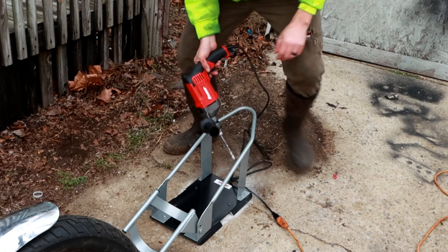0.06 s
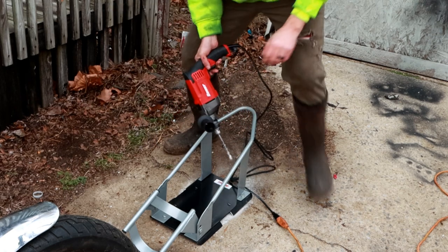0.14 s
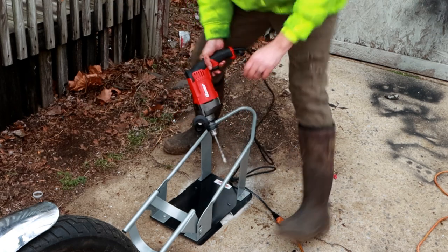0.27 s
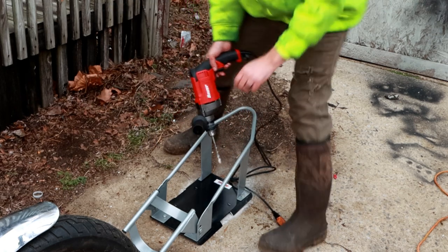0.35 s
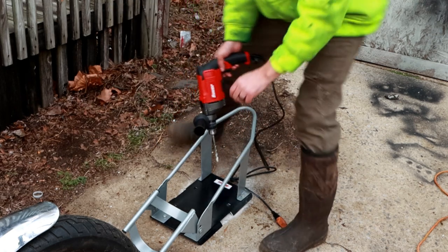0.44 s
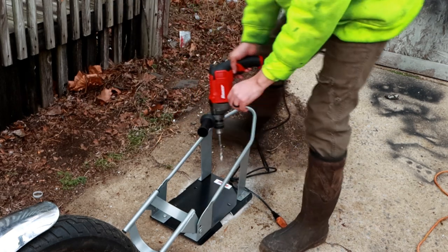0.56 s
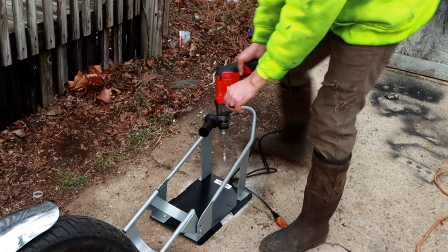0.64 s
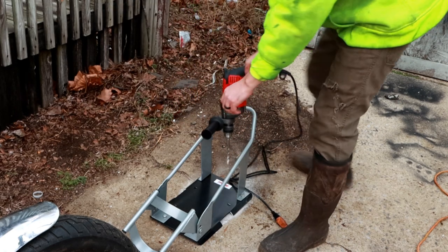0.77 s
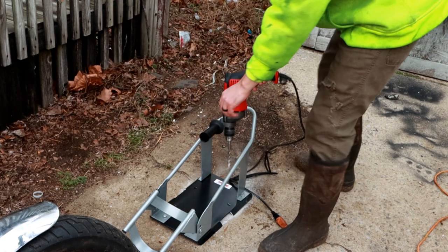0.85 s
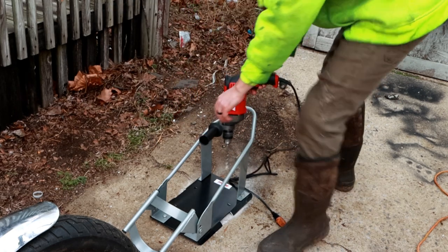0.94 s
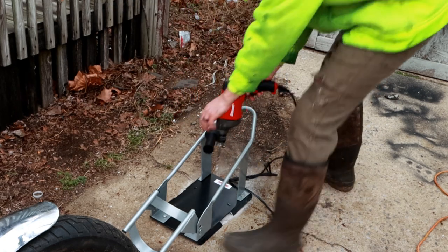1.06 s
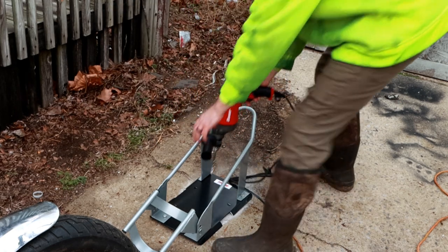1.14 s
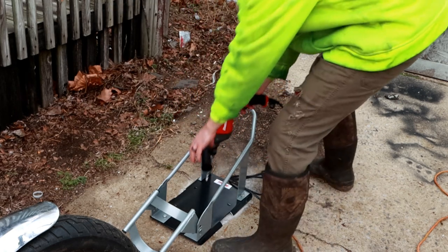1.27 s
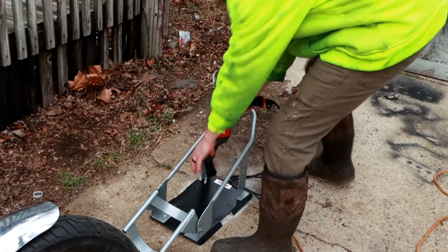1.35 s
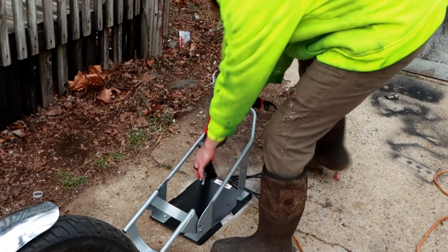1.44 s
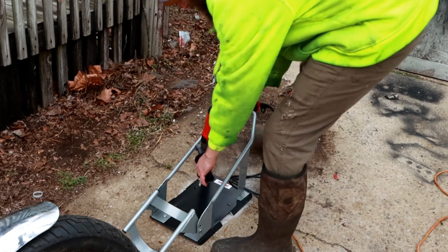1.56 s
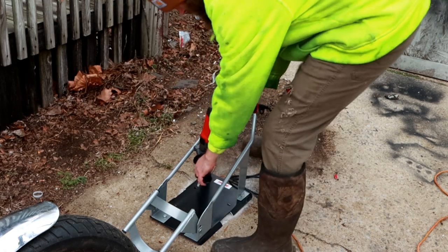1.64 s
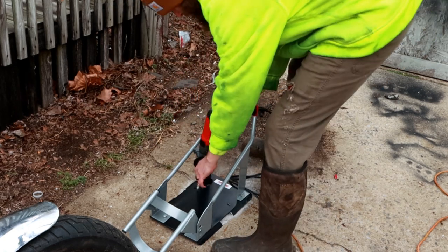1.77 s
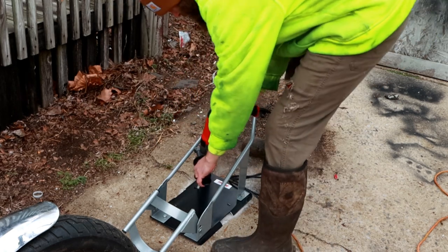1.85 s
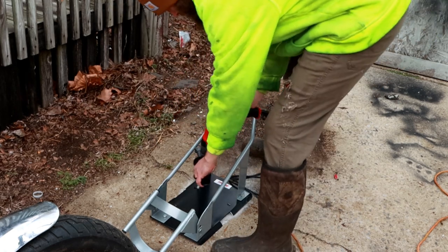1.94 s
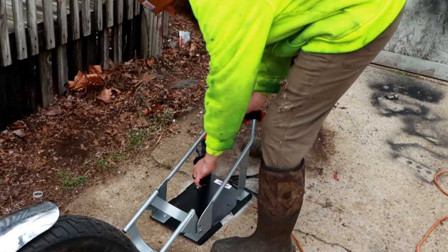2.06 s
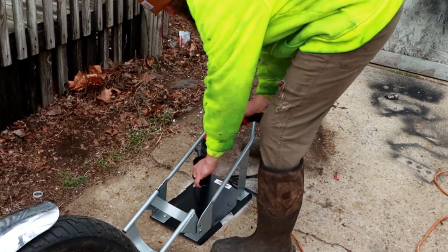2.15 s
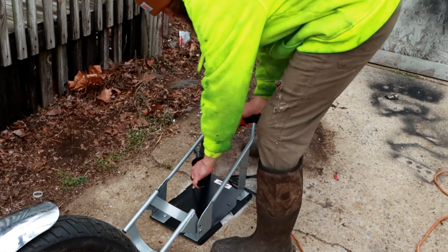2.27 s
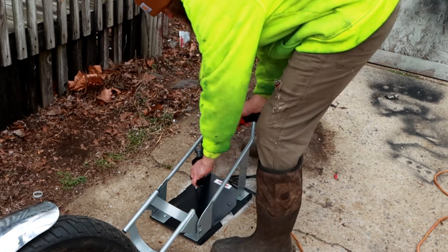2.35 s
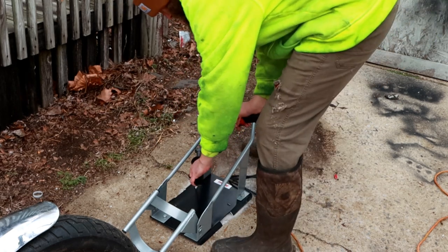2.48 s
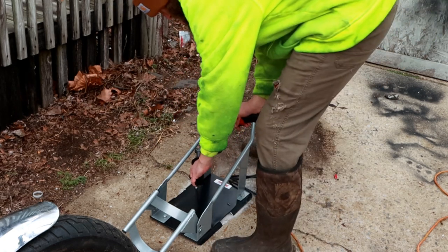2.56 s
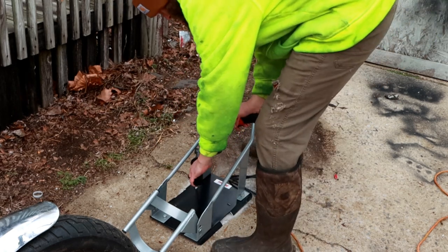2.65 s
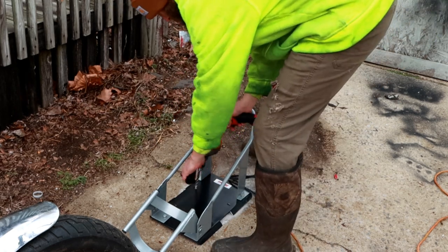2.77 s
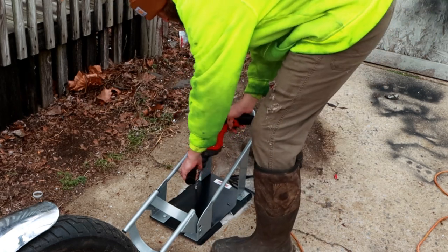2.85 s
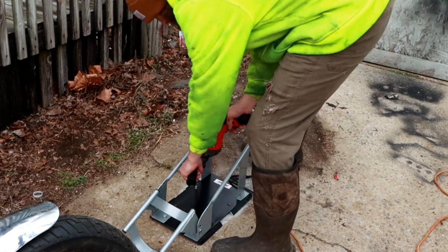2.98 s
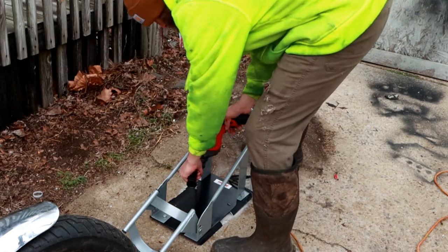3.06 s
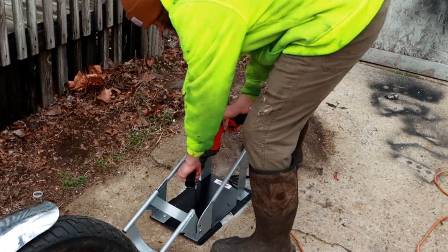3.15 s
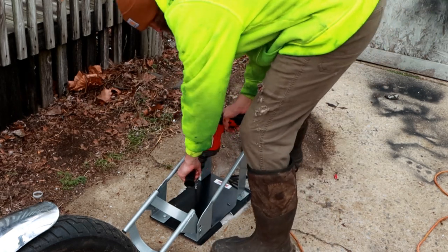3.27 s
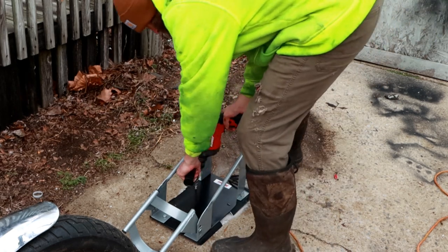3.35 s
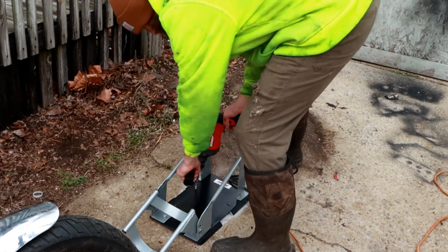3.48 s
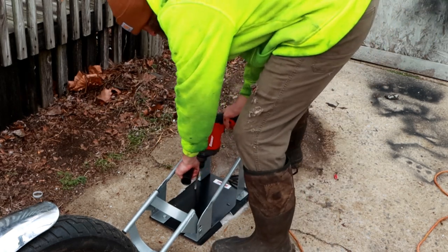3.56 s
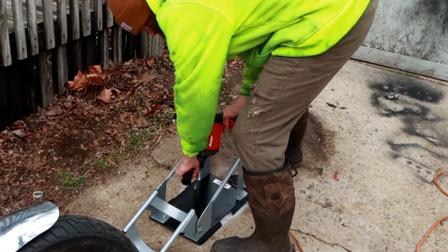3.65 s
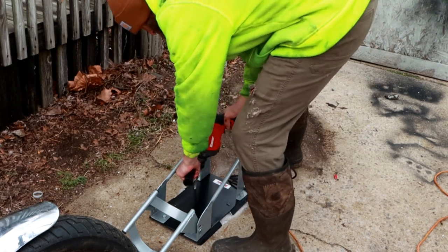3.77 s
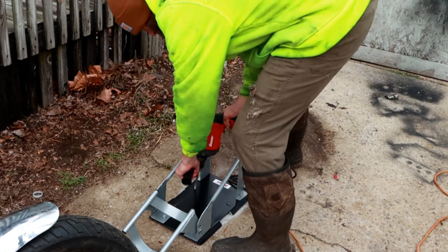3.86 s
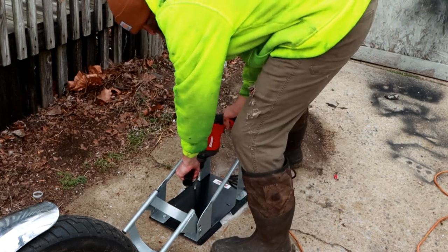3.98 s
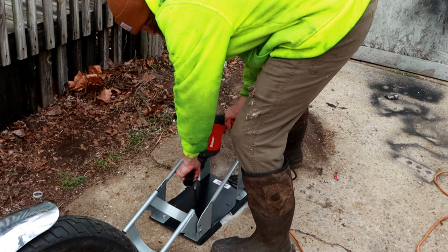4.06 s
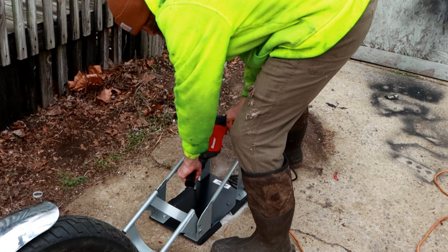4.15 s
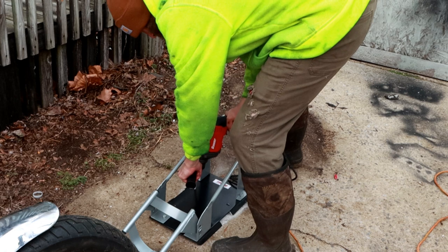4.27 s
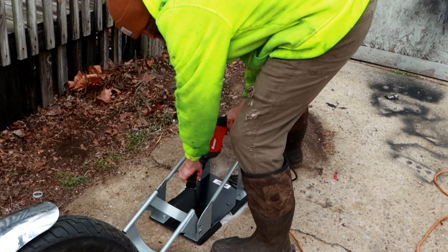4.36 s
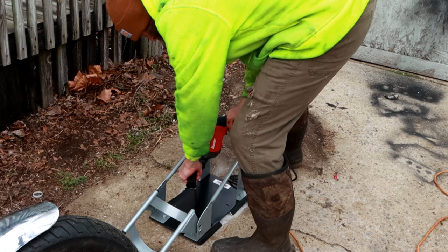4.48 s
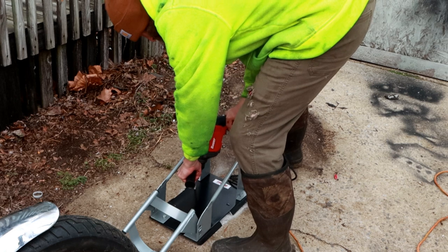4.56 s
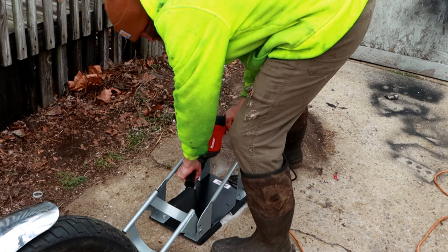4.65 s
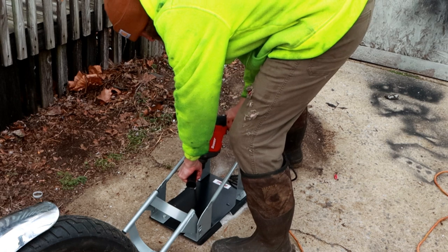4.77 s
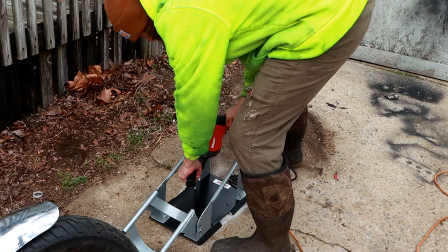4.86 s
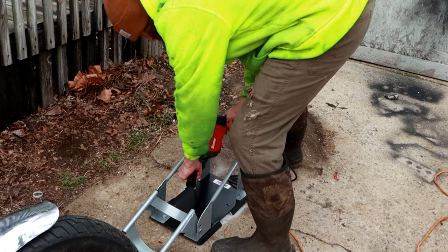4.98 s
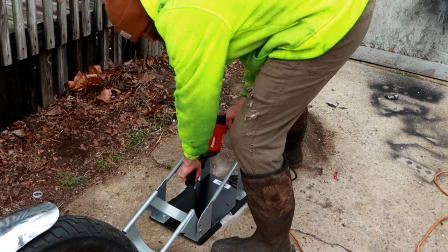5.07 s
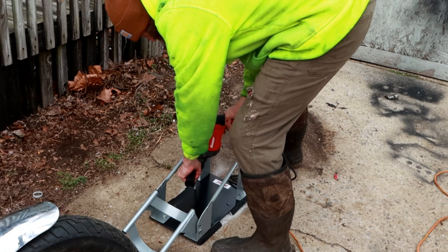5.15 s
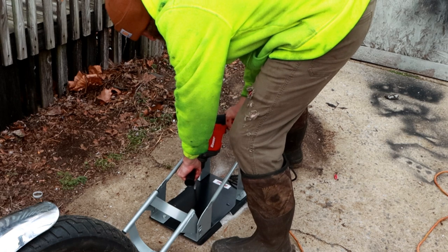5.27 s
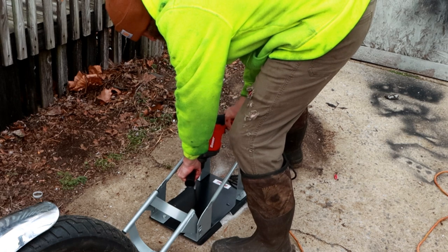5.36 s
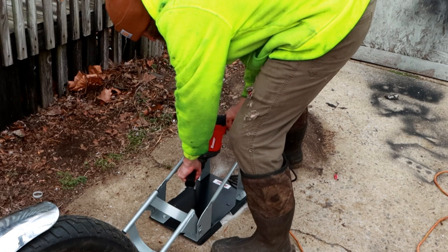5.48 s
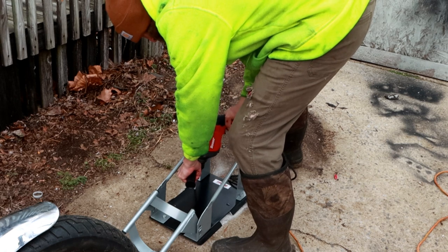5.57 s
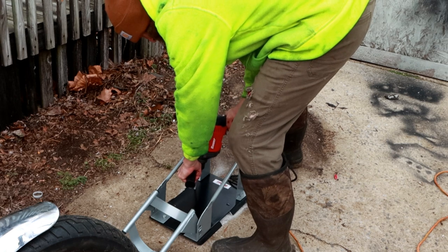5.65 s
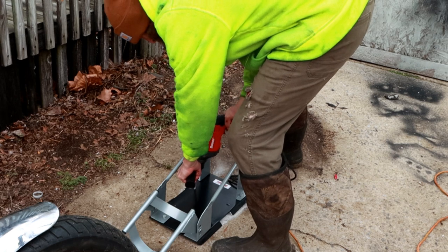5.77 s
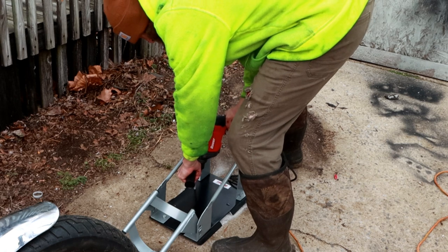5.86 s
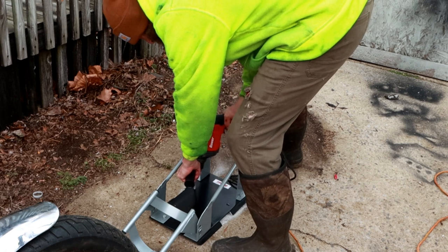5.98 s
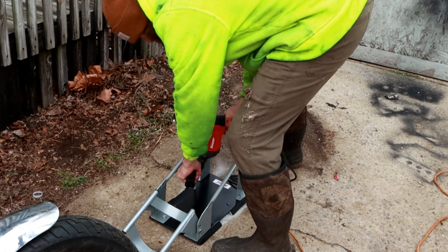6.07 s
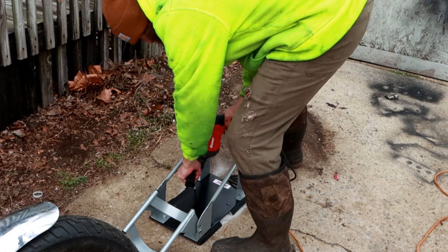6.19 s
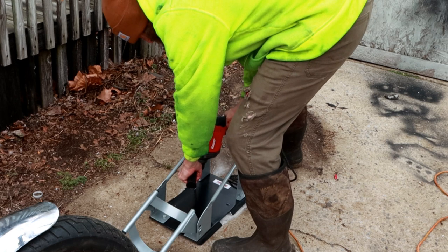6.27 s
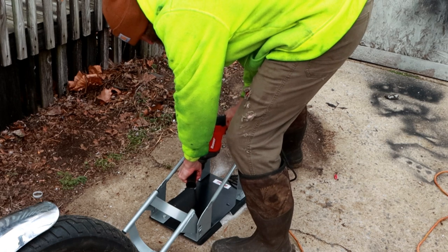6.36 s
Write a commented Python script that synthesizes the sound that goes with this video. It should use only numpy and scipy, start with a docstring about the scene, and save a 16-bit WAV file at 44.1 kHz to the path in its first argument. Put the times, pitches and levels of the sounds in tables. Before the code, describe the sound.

Boots scuff grit and a metal bit knocks a ringing steel stand, then a hammer drill bursts into loud, steady, buzzing hammering on concrete.

```python
"""Outdoors, a worker's boots scuff grit and cloth slides, with small ticks and wind rumble in a murmuring yard.
A hammer drill's bit then knocks against a steel stand, which rings with its own set of decaying tones.
Gears tick as the trigger is squeezed, and the ratchet runs up to some five hundred blows a second.
Each blow adds to a clean tone, rings stand and concrete and throws a puff of grit, heard as hiss.
As the worker leans in, the drill slows. One microphone hears it all, with a short echo of the small hard sounds."""
import sys
import numpy as np
from scipy import signal
from scipy.fft import rfft, irfft
from scipy.io import wavfile
from scipy.ndimage import uniform_filter1d

SR = 44100
rng = np.random.default_rng(int(sys.argv[2]) if len(sys.argv) > 2 else 0)


def transcribe(signal):
    """Save signal, clipped to [-1, 1], as a 16-bit WAV file at the path in sys.argv[1]."""
    frames = np.atleast_2d(signal).T
    limited = np.clip(frames, -1, 1)
    pcm = np.round(limited * 32767).astype(np.int16)
    wavfile.write(sys.argv[1], SR, pcm)


N = 283210  # length of the scene in samples


def undb(db):
    """Turn decibels into a plain gain."""
    return 10 ** (np.asarray(db) / 20)


def unit(x):
    """Scale a sound to an average (rms) level of 1."""
    return x / np.sqrt(np.mean(x ** 2))


def curves(table, outside_db=-120):
    """Columns of a table at every sample; outside_db beyond its span, but a table reaching the end holds."""
    s, *columns = np.transpose(table)
    t = np.arange(N) / SR
    stops_early = s[-1] < N / SR - .02
    return [np.interp(t, s, c, outside_db, outside_db if stops_early else c[-1]) for c in columns]


def colour(x, spectrum, peaks=()):
    """Shape x by (pitch_hz, level_db) points and bell-shaped lifts; rms 1."""
    hz = np.maximum(np.fft.rfftfreq(N, 1 / SR), 1)
    point_hz, point_db = np.transpose(spectrum)
    db = np.interp(np.log(hz), np.log(point_hz), point_db, -90, -90)
    for centre_hz, width_hz, lift_db in peaks:
        db = db + lift_db * np.exp(-2 * ((hz - centre_hz) / width_hz) ** 2)
    return unit(irfft(rfft(x) * undb(db), N))


def ring(x, hz, width_hz):
    """Resonance with gain 1 at its centre."""
    return signal.lfilter(*signal.iirpeak(min(hz, .45 * SR), hz / width_hz, SR), x)


def body(x, peaks):
    """Steep resonances side by side, each filtered twice; rms 1."""
    total = 0
    for k, (hz, width_hz, db) in enumerate(peaks):
        mode = ring(ring(x, hz, width_hz), hz, 2.0 * width_hz)
        total = total + (-1) ** k * undb(db) * mode  # neighbours have opposite signs
    return unit(total)


def band(x, lo_hz, hi_hz):
    """Keep the part of a sound between two pitches."""
    return signal.sosfilt(signal.butter(2, [lo_hz, hi_hz], "band", fs=SR, output="sos"), x)


def walk(rate):
    """Random levels held 1 / rate s and smoothed twice; spread near 1."""
    k = int(SR / rate)
    steps = np.repeat(rng.standard_normal(N // k + 1), k)
    return 1.3 * uniform_filter1d(uniform_filter1d(steps, k), k)[:N]


def add(out, s, sound, db):
    """Place a sound at time s with the given peak level."""
    i = int(s * SR)
    out[i:i + len(sound)] += (sound * undb(db) / np.max(np.abs(sound)))[:N - i]


def fade(t60, length=.5):
    """Dying-away curve that falls by 60 dB in t60 seconds."""
    return np.exp(-np.log(1000) * np.arange(int(length * SR)) / SR / t60)


def grains(per_s, spread_db):
    """Clicks at random moments with a long tail of sizes."""
    return (rng.random(N) < per_s / SR) * rng.standard_normal(N) * undb(spread_db * rng.exponential(size=N))


def swell(s, rise, hold, fall):
    """Gain that rises from -25 dB, holds at 1 and falls to -25 dB, straight in dB; silent outside."""
    corners_s = s + np.cumsum([0, rise, hold, fall])
    return undb(np.interp(np.arange(N) / SR, corners_s, [-25, 0, 0, -25], -120, -120))


def speed():
    """Blows per second: the motor runs up through two lags, trigger and rotor, to what the load allows."""
    # ratchet speed that the load allows, sinking as the worker leans in: time_s, blows_per_s
    allowed = [(3.5, 518), (4.5, 518.5), (4.8, 514.2), (5.1, 503), (5.4, 497.1), (5.58, 483.5),
               (5.7, 467.5), (6.0, 461.5), (6.12, 460.3), (6.25, 467), (6.42, 469.2)]
    trigger_s, run_up_s, squeeze_s = 3.583, .14, .04
    t = np.maximum(np.arange(N) / SR - trigger_s, 0)
    lags = run_up_s * np.exp(-t / run_up_s) - squeeze_s * np.exp(-t / squeeze_s)
    still_missing = lags / (run_up_s - squeeze_s)  # share of the full speed
    return curves(allowed, outside_db=0)[0] * (1 - still_missing)


def drill():
    """Ratchet blows: a clean tone at their rate, uneven blows ringing stand and slab, grit hissing once a blow."""
    # colour of bit and concrete: pitch_hz, level_db (per Hz)
    grind_colour = [(470, -37.5), (800, -16.5), (1320, -19), (1490, -13.5), (1960, -14), (2370, -6.5),
                    (2680, -10), (3200, -5.5), (3760, -6), (4150, -2), (6190, -14), (7370, -10.5),
                    (8250, -17.5), (13900, -17), (15800, -17.5)]
    # bell-shaped lifts on that colour: pitch_hz, width_hz, lift_db
    grind_lifts = [(2305, 230, 1), (3200, 530, 2), (4073, 1120, 2.5), (5490, 83, 6), (7373, 800, 3),
                   (13080, 2050, 4.5)]
    # resonances of the stand under the blows: pitch_hz, width_hz, level_db (relative)
    stand_peaks = [(712, 50, 5), (649.1, 130, -3), (874.2, 30, -11), (930.4, 62, -14.5), (1222, 159, -11),
                   (1693.3, 51, -7)]
    # resonances of concrete and base plate: pitch_hz, width_hz, level_db (relative)
    slab_peaks = [(212.96, 36.14, 1), (334.4, 175.5, 0.5)]
    # clean tones of the blows: time_s, blow_tone_db, octave_db, third_harmonic_db (rms, before wavering)
    tone_levels = [(3.64, -55, -42, -44), (3.7, -27, -31, -35), (3.8, -26, -29, -42),
                   (3.92, -29.5, -39, -44), (4.04, -36, -46, -43), (4.14, -28, -45, -42),
                   (4.6, -26.5, -48, -44), (5.0, -28.5, -50, -37.5), (5.42, -30, -52, -36),
                   (5.6, -33, -46, -45), (5.95, -29.5, -43, -50), (6.42, -32, -40, -46)]
    teeth, full_speed = 16, 500  # ratchet teeth per turn of the chuck; reference speed in blows per s
    hz = speed()
    octaves = np.log2(np.maximum(hz, 80) / full_speed)

    def follow_speed(db, db_per_octave, start_s, attack_s):
        """Level that starts when the bit bites and follows the speed; db is the level at full_speed."""
        return undb(db + db_per_octave * octaves) * swell(start_s, attack_s, 10, 1)

    turns = np.cumsum(hz) / SR  # counted in blows, not in turns of the chuck
    blow, phase = turns.astype(int), turns % 1
    tone = 0
    for k, (db, waver_db) in enumerate(zip(curves(tone_levels), (1.4, 3.0, 2.5)), 1):
        tone = tone + undb(db + waver_db * walk(25)) * np.sin(2 * np.pi * k * turns)

    # the two-edged bit repeats its pattern of blows every half turn; the concrete adds its own scatter
    edges = unit(rng.standard_normal(teeth // 2))[blow % (teeth // 2)]
    scatter = rng.standard_normal(N // 40)[blow]
    uneven = (np.diff(blow, prepend=0) > 0) * (.7 * edges + scatter)
    shake = unit(uneven) + .7 * rng.standard_normal(N)

    wobble = 1 + 0.0706 * np.cos(2 * np.pi * turns / teeth)  # once per turn of the chuck
    pulse = 1 + 0.344 * np.cos(2 * np.pi * turns)  # once per blow
    wash = colour(rng.standard_normal(N) * wobble * pulse, grind_colour, grind_lifts)
    puff_gain = undb(.8 * edges + .8 * scatter) * np.exp(-phase / .35)  # fades until the next blow
    puff = colour(rng.standard_normal(N) * puff_gain, grind_colour, grind_lifts)
    # the treble follows each blow closely, the middle rings on between them
    treble = unit(band(puff, 4180, 16400))
    grind = unit(wash + undb(-11.5) * treble + undb(-10) * puff)
    grind = follow_speed(-13.8, 3, 3.63, .065) * undb(0.588 * walk(9.8)) * grind

    # as the hole deepens the stand rings less and the slab drums more
    boring_s = np.arange(N) / SR - 3.7
    ringing_gain = follow_speed(-30.3, 0, 3.63, .04) * undb(-.7 * boring_s + 1.8 * walk(6))
    drumming_gain = follow_speed(-37.5, -6, 3.61, .01) * undb(.9 * boring_s + 1.2 * walk(5))
    ringing = ringing_gain * body(shake, stand_peaks)
    drumming = drumming_gain * body(shake, slab_peaks)
    sound = np.sqrt(2) * tone + ringing + drumming + grind
    # low cut: nothing deep is heard in the drill
    return signal.sosfilt(signal.butter(6, 155, "high", fs=SR, output="sos"), sound)


def knocks():
    """Each knock is a blow and a short rattle that ring the stand's modes; where it lands sets its colour."""
    # bit against the stand: start_s, level_db, boom_db (near 700 Hz), brightness_db (above 3 kHz),
    # edge_db (above 7 kHz), rattle_t60_s; all levels relative
    hits = [(1.7903, -35, 17, 10, -26, .047), (1.8118, -29, 5, -1, -30, .046),
            (1.8444, -53, 28, 0, -15, .12), (1.9645, -38, 14, 5, -24, .09),
            (2.0471, -36, 22, -2, -33, .045), (2.0874, -62, 41, 3, -12, .08),
            (2.1878, -65, 20, 11, -3, .06), (2.374, -30, 15, 5, -28, .04), (2.3994, -38, 3, -3, -30, .065),
            (2.4568, -45, 17, 2, -17, .05), (2.5696, -46, 14, 9, -24, .06), (2.612, -24, 2, 5, -12, .076),
            (2.6938, -50, 5, 2, -21, .12), (2.8501, -45, 14, 12, 11, .03), (2.866, -30, 2, 9, 9, .038),
            (2.8847, -18.5, 0, -1, -21, .076), (2.9094, -31, 3, -2, -10, .11),
            (3.1775, -56, 0, 13, 21, .09), (3.2949, -39, 7, -17, -27, .08), (3.417, -30, 4, -14, -32, .085),
            (3.62, -44, 20, 11, 4, .05), (3.6547, -42, 16, 19, 2, .12)]
    # tones of the steel stand: pitch_hz, level_db (relative), t60_s (longest ring, shortened below)
    stand_modes = [(470, -12, 0.057), (650.5, 1.5, 0.162), (718.04, -2, .3), (860.6, -5, 0.4),
                   (1107, -1, 0.089), (1308, 1, 0.271), (1516, -21.5, 0.15), (1727, -2.5, 0.0924),
                   (1884.5, 6.5, 0.142), (2156, -9, 0.11), (2473, -3, 0.17), (2677, 1, 0.076),
                   (2957, -4.5, 0.095), (3079, 1, 0.096), (3408, 1.5, 0.087), (3530, -9.5, 0.049),
                   (3880, 3, 0.057), (4297, -2.5, 0.066), (4730, -13.5, 0.038), (5290, -3.5, .12),
                   (5940, -24, 0.09), (6187, -9, 0.07), (7620, -27, 0.097), (9380, -21.5, .1),
                   (11760, -7, .1), (12100, -14, .07)]
    # colour of a knock: pitch_hz, level_db, then the shares of boom, brightness and edge (plain factors)
    knock_colour = [(480, -12, .8, 0, 0), (720, 1.5, 1, 0, 0), (1100, -1, .25, 0, 0), (1500, 0, 0, 0, 0),
                    (2900, 0, 0, 1, 0), (4500, -5, 0, 1.2, 0), (5400, -10, 0, 1.3, .1), (6800, -3, 0, 0, 1),
                    (11500, 0, 0, 0, 1)]
    out, (hz, mode_db, t60) = np.zeros(N), np.transpose(stand_modes)
    t = np.arange(SR // 2) / SR
    log_hz = np.log(np.maximum(np.fft.rfftfreq(len(t), 1 / SR), 1))
    # modes relative to their neighbours; the overall colour comes from the knock
    own_db = mode_db - uniform_filter1d(mode_db, size=7)
    # hands and ground damp the modes: 160 cycles plus 0.04 s at most
    decay = np.exp(-np.log(1000) * t / np.minimum(t60, 160 / hz + .04)[:, None])
    colour_hz, colour_db, *shares = np.transpose(knock_colour)
    for s, db, *parts_db, rattle_s in hits:
        # every knock meets the modes with slightly different strengths and pitches
        chance = rng.standard_normal((2, len(hz)))
        mode_hz = hz * (1 + .008 * chance[1])
        modes = undb(own_db + 3.5 * chance[0]) @ (np.sin(2 * np.pi * mode_hz[:, None] * t) * decay)
        push = rng.standard_normal(len(t)) * fade(rattle_s)
        push[:3] += 2.0  # the blow itself
        # the treble of the rattle dies first
        hiss = rng.standard_normal(len(t))
        crack = band(hiss, 140, 5920) * fade(1.28 * rattle_s)
        crack += undb(3.5) * band(hiss, 6650, 11130) * fade(0.526 * rattle_s)
        sound = unit(signal.fftconvolve(push, modes)[:len(t)]) + unit(crack)
        shape_db = np.interp(log_hz, np.log(colour_hz), colour_db + np.dot(parts_db, shares))
        shape_db -= 40 * np.maximum(np.log(300) - log_hz, 0)  # steep fall below 300 Hz
        shaped = irfft(rfft(sound) * undb(shape_db), len(t))[:len(t) * 4 // 5]
        onset = 1 - np.exp(-t[:len(shaped)] / .0015)  # soft start of the contact
        i = int(s * SR)
        out[i:i + len(shaped)] += shaped * onset * undb(db - 15)
    return out


def ticks():
    """A sharp click and a tiny rattle through a small hard body; gears tick too as they take up their slack."""
    # small hard ticks: start_s, level_db (5 dB below the peak), under_6khz_db, over_10khz_db (both relative)
    single_ticks = [(0.2306, -50.5, -6, -15.5), (0.5544, -51, -5, -5.5), (0.7262, -53.5, -5, -12),
                    (1.044, -36, -23, -6), (1.3441, -29, -22, -15), (1.4316, -48, -19.5, -15),
                    (1.704, -43, -12.5, -4), (2.0168, -40.5, 4, 16), (2.354, -54, 17, -8),
                    (3.47, -53, -8.5, 1), (3.5418, -49, -10.5, 3), (3.6589, -20, 6, 6.5)]
    # resonances of the small hard body: pitch_hz, width_hz, level_db (relative)
    tick_peaks = [(3660, 305, 5), (5000, 700, -3.5), (7180, 183, -14), (8750, 1280, -7), (10460, 930, -6),
                  (12040, 404, -3), (15200, 640, -22)]
    out = np.zeros(N)
    # six gear ticks under the trigger, their gaps closing ever faster
    k = np.arange(6)
    first_s, gap_s, closing_s = 3.5582, .0167, .0004
    times = first_s + k * gap_s - np.cumsum(closing_s * np.maximum(k - 1, 0) ** 2)
    # level, under 6 kHz and over 10 kHz (dB) of the first tick, and their growth per tick
    levels_db = (-31, -18, -12) + np.outer(k, (1.0, 2.5, 2.5))
    slack = np.column_stack([times, levels_db])
    for s, db, low_db, high_db in [*single_ticks, *slack]:
        burst = rng.standard_normal(SR // 5) * fade(.017, length=1 / 5)
        burst[0] += 5.0  # the click
        sound = 0
        for hz, width_hz, mode_db in tick_peaks:
            mode_gain = undb(mode_db + low_db * (hz < 6000) + high_db * (hz > 10000))
            sound = sound + mode_gain * ring(burst, hz, width_hz)
        add(out, s, sound, db + 5)
    return out


def clinks():
    """Bright top of a few ticks and knocks: a short rattle through three high, narrow modes."""
    # thin high clinks: start_s, peak_db, t60_s (of the rattle)
    clink_list = [(1.8113, -45.5, 0.15), (1.9909, -50, 0.15), (2.017, -32, 0.04)]
    # the three high modes: pitch_hz, width_hz, level_db (relative)
    clink_peaks = [(12514, 200, 0), (14120, 214, -3), (15330, 250, -3)]
    out = np.zeros(N)
    for s, db, t60 in clink_list:
        add(out, s, body(rng.standard_normal(SR // 2) * fade(t60), clink_peaks), db)
    return out


def thuds():
    """Dull bumps: a soft push rings one low mode."""
    # bumps: start_s, peak_db, pitch_hz, t60_s
    bumps = [(1.26, -22.5, 397.5, 0.016), (1.793, -25, 247.6, 0.0304), (2.045, -37.5, 367, 0.049),
             (2.372, -24, 315, 0.0144), (2.866, -21, 323, 0.0242), (2.89, -23, 277, 0.04),
             (3.623, -20, 269.6, 0.047), (3.654, -15.5, 310, 0.0237), (3.682, -19.5, 375, 0.038)]
    out = np.zeros(N)
    t = np.arange(SR // 2) / SR
    for s, db, hz, t60 in bumps:
        soft_start = 1 - np.exp(-t / 0.006)
        add(out, s, np.sin(2 * np.pi * hz * t) * fade(t60) * soft_start, db)
    return out


def boots():
    """Boots scuffing: dense grit grains crushed under a sole."""
    # scuffs: start_s, rise_s, hold_s, fall_s, level_db, over_4khz_db (relative)
    scuff_list = [(-.01, .005, .005, .06, -30, -12), (.03, .005, .02, .15, -51, -7),
                  (.83, .006, .03, .03, -35, -18), (.865, .022, .025, .075, -24, -13)]
    # colour of their lower part: pitch_hz, level_db (per Hz)
    scuff_colour = [(110, -51), (180, -18.5), (321, 0), (613, -3.5), (730, -6), (996, 0.5), (2450, -16.5),
                    (4500, -31.5), (5850, -62.5), (9900, -120)]
    # bell-shaped lifts on both parts: pitch_hz, width_hz, lift_db
    scuff_lifts = [(610, 276, 4.5), (1004, 150, -1.5), (3294, 420, 10), (4003, 270, 9.5), (6560, 1560, 12),
                   (11040, 1280, 7)]
    grit = unit(grains(5000, spread_db=2.0)) + 0.69 * rng.standard_normal(N)
    low = colour(grit, scuff_colour, scuff_lifts)
    high = colour(grit, [(4000, -2), (8500, -8), (15800, 5)], scuff_lifts)
    total = 0
    for *shape, db, high_db in scuff_list:
        total = total + swell(*shape) * undb(db) * (low + undb(high_db) * high)
    return undb(1.83 * walk(89.72)) * total


def rubs():
    """Rubbing sounds with a faint squeal, on steel or cloth: rough friction excites narrow resonances."""
    # rubbing sounds: start_s, rise_s, hold_s, fall_s, level_db
    rub_list = [(.0, .02, .08, .04, -46), (.41, .055, .02, .09, -47), (.98, .015, .27, .04, -59.5),
                (2.335, .008, .03, .01, -44), (2.8, .03, .025, .01, -46)]
    # one list of resonances for each rub: pitch_hz, width_hz, level_db (relative)
    squeal_peaks = [
        [(1728, 87, 0.5), (2953, 66, -3.5), (3468, 98, -2), (4205, 122, -4), (5130, 35, -13)],
        [(1467, 150, 1), (2600, 44, -13.5), (2920, 117, -5.5), (4104, 59, 2.5)],
        [(2535, 112, 0.5), (4135, 173, -3.5)],
        [(1239.2, 18.3, 3), (1815, 27, -2), (2360, 28.5, -13.5), (2930, 31, -21)],
        [(2613, 52, 0), (3130, 140, 0.5), (3760, 35, -9.5), (4400, 35, -10.5)],
    ]
    friction = rng.standard_normal(N) * undb(2.6 * walk(80))
    rough = undb(-6.5) * unit(band(friction, 500, 3610))
    total = 0
    for (*shape, db), peaks in zip(rub_list, squeal_peaks):
        total = total + swell(*shape) * undb(db) * (body(friction, peaks) + rough)
    return total


def cloth():
    """Fine hiss of fabric, its upper and lower part flickering apart, with a rustle lower in pitch."""
    # cloth sliding: start_s, rise_s, hold_s, fall_s, hiss_db, rustle_db
    swishes = [(-.1, .05, .05, .3, -63, -46), (.4, .15, .05, .3, -68, -64), (.93, .16, .14, .2, -40, -59),
               (1.2, .05, .1, .04, -51, -62), (1.35, .1, .22, .15, -56, -61),
               (1.75, .05, .05, .4, -68, -58), (2.3, .05, .08, .15, -67, -64),
               (3.08, .1, .04, .14, -51, -66), (3.2, .1, .3, .05, -60, -65)]
    # colour of the hiss: pitch_hz, level_db (per Hz)
    hiss_colour = [(4120, -33.5), (7000, -19), (7730, -24.5), (7970, -16), (9220, -7), (11400, -6.5),
                   (12500, -6), (14000, -3), (15800, -9)]
    # colour of the rustle: pitch_hz, level_db (per Hz)
    rustle_colour = [(710, -33.5), (1200, -0.5), (2260, -10.5), (2570, -5), (3590, -7.5), (8000, -17.5),
                     (10400, -51), (17600, -120)]
    # bell-shaped lift on both: pitch_hz, width_hz, lift_db
    cloth_lifts = [(10800, 680, 3)]
    # faint steady levels, heard between the slides
    hiss_gain, rustle_gain = undb(-70), undb(-69)
    for *shape, hiss_db, rustle_db in swishes:
        slide = swell(*shape)
        hiss_gain = hiss_gain + undb(hiss_db) * slide
        rustle_gain = rustle_gain + undb(rustle_db) * slide
    fibres = unit(grains(1200, spread_db=2.5)) + 1.5 * rng.standard_normal(N)
    hiss = colour(fibres, hiss_colour, cloth_lifts)
    rustle = colour(fibres, rustle_colour, cloth_lifts)
    lower = band(hiss, 4900, 10060)
    hiss = undb(1.7 * walk(12)) * lower + undb(1.15 * walk(15)) * (hiss - lower)
    return hiss_gain * hiss + rustle_gain * undb(2.17 * walk(18)) * rustle


def air():
    """Gusty rumble on the microphone over the murmur of the yard, both made of filtered noise."""
    # wind and handling on the microphone: time_s, deep_db (under 50 Hz), low_db (50 to 140 Hz)
    rumble = [(0.0, -56, -52), (.8, -51, -48), (1.1, -48, -52), (1.2, -31, -39), (1.32, -33, -46),
              (1.43, -44, -50), (1.62, -45, -43), (1.72, -32, -45), (1.93, -50, -46), (2.0, -38, -43),
              (2.23, -54, -49), (2.45, -42, -54), (2.8, -53, -56), (3.06, -58, -58), (3.45, -55, -53),
              (3.57, -49, -46), (3.7, -69, -77), (6.42, -69, -77)]
    # colour of the yard: pitch_hz, level_db (per Hz)
    yard_colour = [(71, -27), (120, -0.5), (156, -12.5), (501, -14.5), (544, -13), (602, -14.5),
                   (785, -15.5), (2090, -32.5), (2270, -45), (15800, -65.5)]
    # murmur of the yard, silent after the last row: time_s, level_db (before wavering)
    murmur = [(0.0, -52), (1.3, -50), (2.6, -52.5), (3.05, -56.5), (3.5, -51), (3.7, -54)]
    deep_db, low_db = curves(rumble)
    deep = unit(band(rng.standard_normal(N), 6.9, 31.1))
    low = unit(band(band(rng.standard_normal(N), 37, 86), 29.6, 137))
    murmur_gain = undb(curves(murmur)[0] + 1.5 * walk(5))
    return undb(deep_db) * deep + undb(low_db) * low + murmur_gain * colour(rng.standard_normal(N), yard_colour)


def scene():
    """Add all the layers; the short knocks, ticks, clinks and thuds also echo."""
    close = knocks() + ticks() + clinks() + thuds()
    # fence and wall send back a short diffuse tail
    tail = band(rng.standard_normal(SR // 2), 200, 7460) * fade(0.1288)
    tail = tail / np.sqrt(np.sum(tail ** 2))
    echoing = close + undb(-14) * signal.fftconvolve(close, tail)[:N]
    return np.tile(echoing + drill() + boots() + rubs() + cloth() + air(), (2, 1))


def record(dry):
    """One microphone on both channels; loud peaks are rounded and the top is cut steeply."""
    limit, top_hz = .44, 15800  # limit: the highest level the rounding lets through
    rounded = limit * np.tanh(dry / limit)
    return signal.sosfilt(signal.ellip(12, .2, 100, top_hz, fs=SR, output="sos"), rounded)


dry = scene()
out = record(dry)
transcribe(out)
```